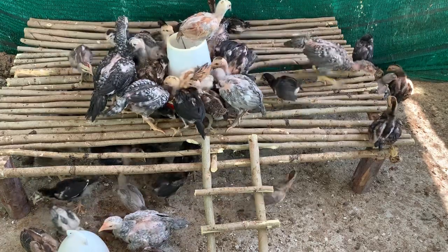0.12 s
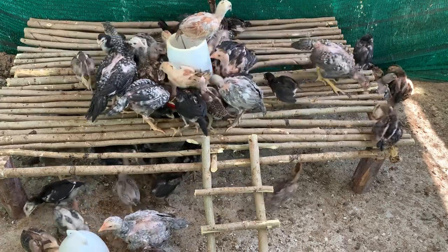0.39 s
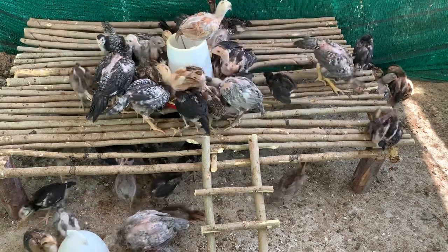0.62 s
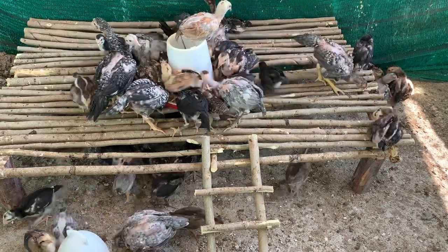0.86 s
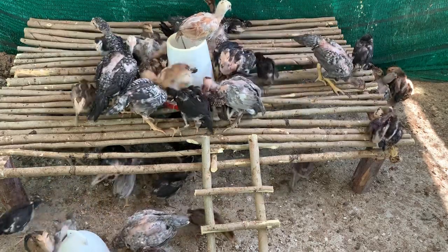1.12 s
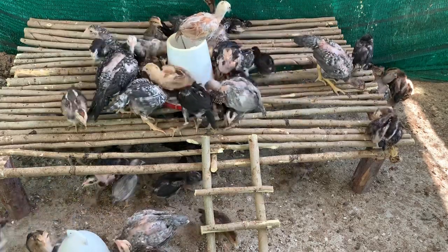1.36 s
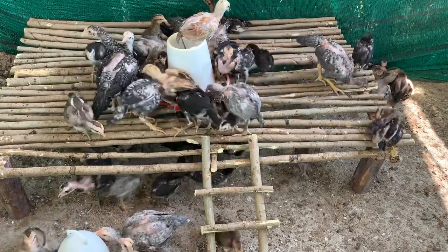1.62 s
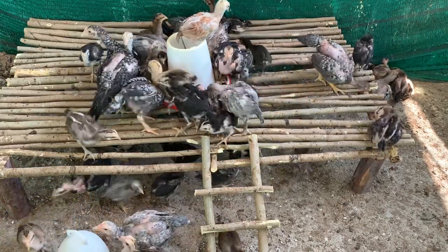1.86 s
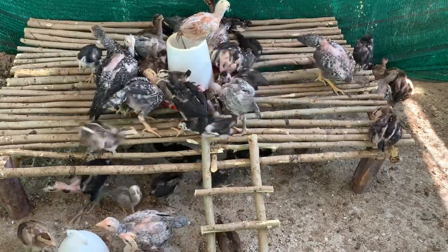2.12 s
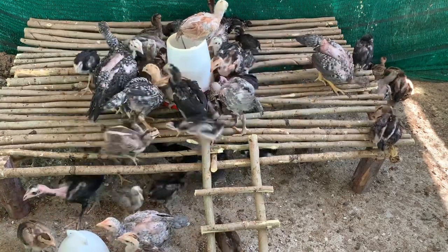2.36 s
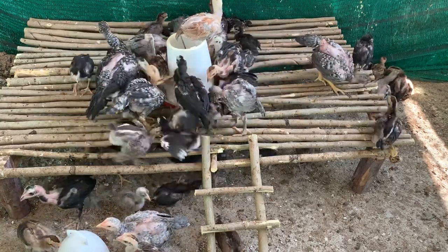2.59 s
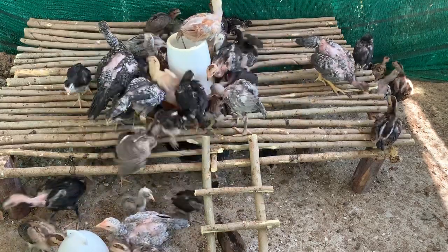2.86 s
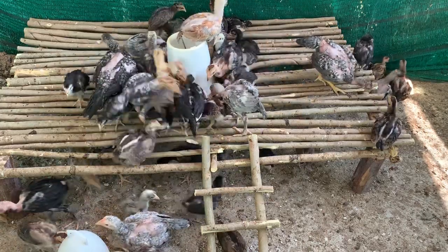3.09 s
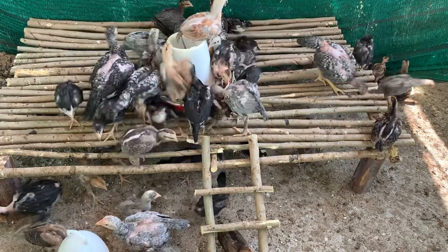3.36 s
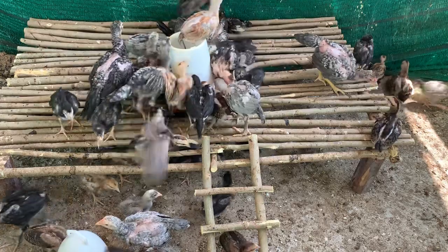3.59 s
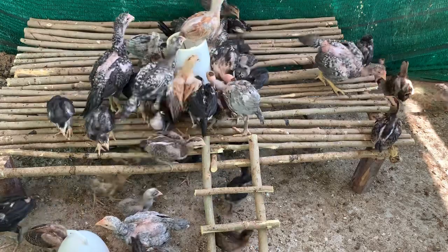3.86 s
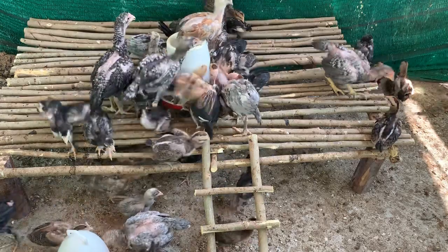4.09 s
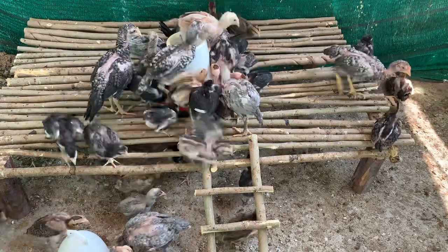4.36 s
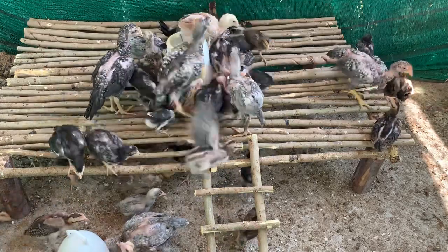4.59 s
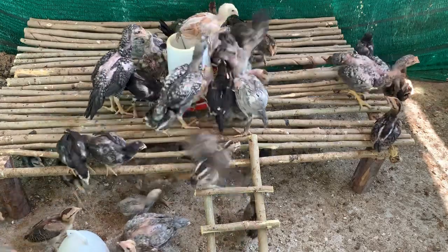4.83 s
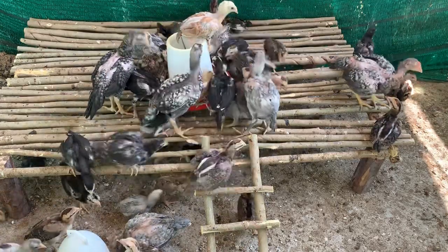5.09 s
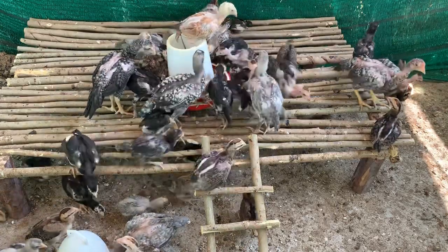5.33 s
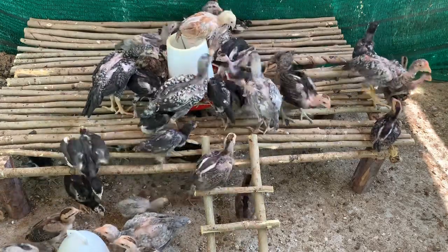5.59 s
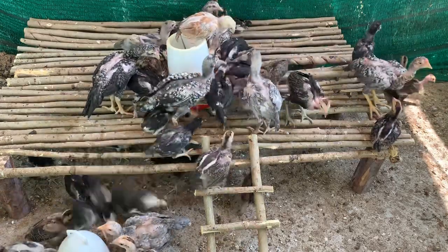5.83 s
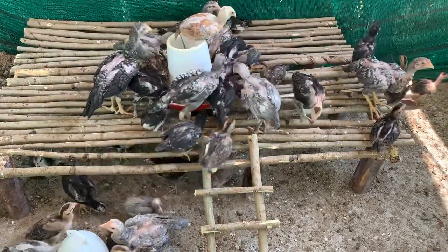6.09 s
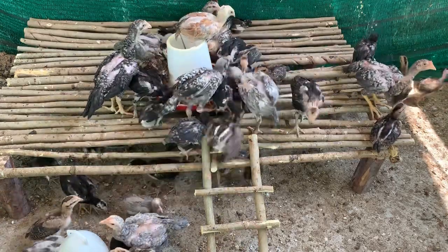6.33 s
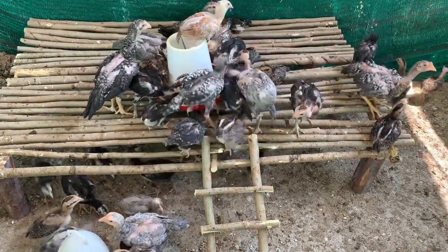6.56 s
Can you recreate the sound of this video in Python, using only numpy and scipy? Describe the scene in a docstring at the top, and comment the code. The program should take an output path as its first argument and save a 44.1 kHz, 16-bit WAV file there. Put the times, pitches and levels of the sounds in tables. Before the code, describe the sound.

A dense flock of young chickens peeps without pause around a feeder, with feet knocking on wooden poles and a few hoarse squawks.

```python
"""In a netted pen with a floor of wooden poles, young chickens peep around a feeder, a metre or two from a phone.
Near chicks are gliding whistles, mostly falling, over a dense chorus of many short whistles.
Rough shaking of the tone makes some squawk hoarsely, and stacked whistles make two shrieks.
Feet and beaks ring the poles as dying tones, grit ticks as short noise, feathers rustle as flickering hiss.
Low noise makes the rumble of the yard, and wavering tones the hum of a distant engine.
"""
import sys
import numpy as np
from scipy import signal
from scipy.fft import rfft, irfft, next_fast_len
from scipy.io import wavfile
from scipy.ndimage import uniform_filter1d

SR = 44100
rng = np.random.default_rng(int(sys.argv[2]) if len(sys.argv) > 2 else 0)


def transcribe(signal):
    """Save signal, clipped to [-1, 1], as a 16-bit WAV file at the path in sys.argv[1]."""
    frames = np.atleast_2d(signal).T
    limited = np.clip(frames, -1, 1)
    pcm = np.round(limited * 32767).astype(np.int16)
    wavfile.write(sys.argv[1], SR, pcm)


def convert_level_to_amplitude(level_db):
    """Map a level in decibels to its linear amplitude factor."""
    exponent = np.asarray(level_db, float) / 20
    return 10 ** exponent


N = 295469  # length in samples
TIME = np.arange(N) / SR  # seconds

OCTAVE_DB = -28  # usual octave in a near call, against its main tone
RASP_HZ = 270.9  # how fast unsteady breath shakes most calls
NEAR_RASP = 0.32  # share of a near call that shakes
PORT_LAG = 13  # samples by which the left port hears the rustle late


def colour(x, points):
    """Filter by (f/Hz, gain/dB) points joined on a log axis."""
    size = next_fast_len(x.shape[-1])
    hz, db = np.transpose(points)
    log_hz = np.log(np.fft.rfftfreq(size, 1 / SR) + 1)
    gain = convert_level_to_amplitude(np.interp(log_hz, np.log(hz), db))
    return irfft(rfft(x, size) * gain, size)[..., :x.shape[-1]]


def level(x, db):
    """Set the average (rms) level."""
    return x * convert_level_to_amplitude(db) / np.sqrt(np.mean(x ** 2))


def curve(table):
    """Gain over time from (t/s, level/dB) rows."""
    return convert_level_to_amplitude(np.interp(TIME, *np.transpose(table)))


def walk(rate, size=N):
    """Smooth chance: about rate changes a second, spread near 1."""
    k = max(int(SR / rate), 1)
    steps = np.repeat(rng.standard_normal(size // k + 1), k)
    return 1.412 * uniform_filter1d(uniform_filter1d(steps, k), k)[:size]


def add(out, s, pair):
    """Mix a two-channel sound in at time s."""
    i = max(int(s * SR), 0)
    out[:, i:i + pair.shape[1]] += pair[:, :N - i]


def ports(x, lag):
    """The left port hears it lag samples later (earlier if negative)."""
    return np.array([np.roll(x, int(round(lag))), x])


def pen(x, t60=0.16, echo_db=-8):
    """Short scattered echoes from poles, ground and netting, 60 dB down after t60 seconds."""
    t = np.arange(int(0.4 * SR)) / SR
    tail = rng.standard_normal((2, len(t))) * convert_level_to_amplitude(-60 * t / t60) * (1 - np.exp(-t / 0.0073))
    tail = convert_level_to_amplitude(echo_db) * tail / np.sqrt(np.sum(tail ** 2, axis=1, keepdims=True))
    return x + signal.fftconvolve(x, tail, axes=1)[:, :N]


def whistle(length, contour_hz, db, lag, octave_db, rasp, rasp_hz, third_db=-80):
    """One call: a gliding voice-organ tone with its octave; unsteady air shakes size and phase."""
    attack_s, release_s = 0.013, 0.033  # longest rise and fall
    third_hz, third_width_hz = 10600, 720  # the throat lifts the third partial in this band

    # u counts in call lengths: the glide runs from 0 to 1, the sound a little beyond
    u = np.arange(-0.1, 1.2, 1 / (length * SR))
    points = np.linspace(0, 1, len(contour_hz))
    bend = np.polyfit(points, contour_hz, len(contour_hz) - 1)
    hz = np.polyval(bend, np.clip(u, 0, 1))
    phase = 2 * np.pi * (np.cumsum(hz) / SR + rng.random())

    rise, fall = min(0.35, attack_s / length), min(0.5, release_s / length)
    shape = np.clip(np.minimum((u + 0.1) / rise, (1.2 - u) / fall), 0, 1) ** 0.75
    chance = walk(rasp_hz, size=len(u)) + 1j * walk(rasp_hz, size=len(u))
    shake = 1 - min(rasp, 1) + rasp * chance

    lagged = phase - 2 * np.pi * np.outer([lag, 0], hz) / SR
    # reflections off the poles make each port waver on its own
    drift = np.array([walk(45, size=len(u)), walk(45, size=len(u))])
    waver = convert_level_to_amplitude(3 * (drift - drift.mean()))
    tone = np.exp(1j * lagged) + convert_level_to_amplitude(octave_db) * np.exp(2j * lagged)
    throat = ((3 * hz - third_hz) / third_width_hz) ** 2
    tone = tone + convert_level_to_amplitude(third_db) * np.exp(3j * lagged - throat)
    return convert_level_to_amplitude(db) * shape * waver * np.real(shake * tone)


def far_flock(count=1500):
    """Many overlapping short peeps at random pitch; most fall, some hold, each bends its own way."""
    # how loud the whole far flock is over time: t/s, level/dB
    mood = [(0.0, -40.5), (0.75, -39), (0.88, -42.5), (1.06, -42), (1.32, -37), (1.57, -40), (1.73, -43.5),
            (1.94, -36.5), (2.07, -36.5), (2.63, -39.5), (2.95, -39), (3.25, -40.5), (3.66, -34.5),
            (4.07, -34.5), (4.53, -32.5), (5.6, -36), (6.44, -37), (6.7, -39)]
    # how strong voices are by their first pitch: f/Hz, level/dB
    voices = [(2000, -30), (2600, -15.5), (3300, -5), (4200, -1.5), (4900, -6), (5500, -13.5),
              (6200, -20.5)]
    lowest_hz = 2000
    out = np.zeros((2, N))
    hz, db = np.transpose(voices)
    for when, pitch, fall, span, size, side, bend in rng.random((count, 7)):
        first_hz = hz[0] + pitch * (hz[-1] - hz[0])
        length = 0.018 + 0.055 * span ** 2.0
        drop = first_hz * length * (9 * fall ** 1.1 - 0.3)
        drop = min(drop, first_hz - lowest_hz)
        size_db = np.interp(first_hz, hz, db) - 11 * size ** 0.6
        middle_hz = first_hz - (0.9 * bend + 0.0486) * drop
        contour_hz = [first_hz, middle_hz, first_hz - drop]
        lag = 6 - 19 * side
        add(out, when * N / SR, whistle(length, contour_hz, size_db, lag, -30, 0.42, RASP_HZ))
    out = pen(out, 0.15, -3.5)  # distance blurs them
    # voices fill each other's pauses, so the sum follows the mood of the flock
    power = uniform_filter1d(np.mean(out ** 2, axis=0), size=2600)
    steady = out / np.sqrt(power + 1e-6)
    return steady * curve(mood)


def rustle():
    """Feathers and litter: patchy hiss from one side; each band flickers on its own."""
    # how the rustle swells and fades: t/s, level/dB (relative)
    swell = [(0.0, -57), (0.3, -60.5), (0.49, -55.5), (0.78, -52.5), (0.95, -57.5), (1.9, -61),
             (3.11, -60.5), (3.58, -59.5), (4.2, -56), (4.3, -56), (4.4, -44.5), (4.55, -49), (4.76, -56.5),
             (5.06, -54), (5.45, -60), (5.8, -52.5), (6.1, -57), (6.7, -60.5)]
    # tone of the hiss: f/Hz, level/dB (relative)
    tint = [(1000, 5.5), (3000, 16), (6500, 1.5), (8000, -0.5), (10000, -3.5), (14000, -5.5), (16000, -38)]
    own_share = 0.45  # noise that differs between the ports
    out = 0
    for hz in [1500, 2600, 4400, 6200, 8000, 10000, 12500, 15000]:
        shared, own = rng.standard_normal(N), rng.standard_normal((2, N))
        hiss = ports(shared, PORT_LAG) + own_share * own
        band = colour(hiss, [(hz / 5.9, -40), (hz / 1.14, 0), (hz * 1.31, 0), (hz * 2.0, -40)])
        out = out + band * convert_level_to_amplitude(3.5 * walk(18) + 3.5 * walk(120))
    patchy = out * convert_level_to_amplitude(1.36 * walk(40))
    return level(colour(patchy, tint), 9.55) * curve(swell)


def yard():
    """Low outdoor rumble, much alike at both ports in the bass, and the wavering engine lines."""
    # tone of the rumble: f/Hz, level/dB (relative)
    tint = [(18, -46.5), (30, -16), (91, -1.5), (151, -3.5), (213, -4), (269, -11.5), (385, -9),
            (650, -19.5), (1090, -19), (2200, -21), (2860, -42), (4840, -120)]
    # steady lines of the distant engine: f/Hz, level/dB (relative)
    engine = [(80.7, -56), (102.3, -56.5), (204.6, -62.5), (382.2, -70)]
    mid, side = rng.standard_normal((2, N))
    side = colour(side, [(60, -12), (250, -11.5), (700, 0.5), (1500, -12.0)])
    rumble = colour(mid + side * np.array([[1], [-1]]), tint)
    rumble = level(rumble, -52.5) * convert_level_to_amplitude(1.4 * walk(3))
    hum = 0
    for hz, db in engine:
        strength = convert_level_to_amplitude(db + 3.5 + 1.7 * walk(4.5))
        wavering_hz = hz + 2.327 * walk(5)
        hum = hum + strength * np.sin(2 * np.pi * np.cumsum(wavering_hz) / SR)
    return (rumble + hum) * convert_level_to_amplitude(np.array([[-0.8], [0.8]]))  # a little stronger on the right


def near_peeps():
    """Clear whistles of near chicks: straight glides, fast swoops and wide-open beaks."""
    # straight glides: t/s, length/s, first f/Hz, last f/Hz, level/dB
    glides = [(0.122, 0.07, 3115, 2170, -38.5), (0.133, 0.08, 3710, 2950, -36),
              (0.223, 0.041, 5340, 5400, -45), (0.285, 0.048, 4970, 3900, -35),
              (0.353, 0.052, 3870, 3310, -28), (0.38, 0.054, 3060, 2530, -34),
              (0.518, 0.056, 4110, 3450, -35.5), (0.427, 0.016, 1812, 1480, -42),
              (0.543, 0.037, 3450, 2900, -30), (0.566, 0.083, 6700, 6500, -51),
              (0.592, 0.054, 3350, 3120, -33), (0.653, 0.023, 4150, 3760, -27.5),
              (3.462, 0.054, 6050, 5900, -41.5), (0.65, 0.03, 5070, 5020, -30),
              (0.676, 0.052, 3310, 3210, -30.5), (0.948, 0.032, 2760, 2690, -36),
              (1.026, 0.072, 2920, 2760, -43), (1.075, 0.048, 4800, 4070, -35),
              (1.125, 0.037, 3770, 3510, -30), (1.173, 0.038, 3400, 3060, -33.5),
              (1.56, 0.035, 4970, 4830, -41), (1.68, 0.039, 3820, 3600, -30.5),
              (1.178, 0.067, 1785, 1540, -42.5), (1.356, 0.034, 3790, 3540, -31.5),
              (1.378, 0.045, 5000, 4600, -40), (1.404, 0.025, 1613, 1715, -45),
              (1.504, 0.047, 3360, 3300, -35), (1.622, 0.017, 3220, 2830, -31),
              (2.146, 0.095, 3520, 3100, -34.5), (2.211, 0.0502, 3870, 3824, -27),
              (2.224, 0.017, 1074, 1080, -43.5), (2.26, 0.027, 1090, 1090, -52),
              (2.448, 0.033, 1570, 1440, -46), (2.246, 0.036, 5220, 4530, -33),
              (2.355, 0.082, 2735, 2410, -38), (2.381, 0.069, 3736, 3133, -29),
              (2.433, 0.07, 4010, 3880, -29), (2.605, 0.051, 3290, 2280, -33.5),
              (2.57, 0.076, 1065, 1154, -53), (2.626, 0.11, 3670, 2473, -29.5),
              (2.727, 0.0125, 2610, 2020, -31.5), (2.746, 0.015, 1180, 1130, -49),
              (2.796, 0.05, 1140, 1140, -53), (2.861, 0.02, 2810, 2130, -27.5),
              (2.892, 0.036, 3910, 3630, -25.5), (2.893, 0.037, 975, 943, -45.5),
              (2.911, 0.034, 2286, 2220, -33.5), (3.008, 0.023, 1395, 1330, -44),
              (3.112, 0.0074, 1690, 1415, -25.5), (3.227, 0.033, 4760, 4500, -34),
              (3.462, 0.071, 3304, 3390, -30), (3.485, 0.022, 3750, 3320, -23),
              (3.769, 0.071, 3420, 3270, -32), (3.781, 0.01247, 2460, 1940, -34),
              (3.834, 0.028, 3850, 3750, -24), (3.882, 0.059, 2840, 2060, -36.5),
              (4.245, 0.075, 1760, 1640, -41), (4.277, 0.024, 5140, 5080, -23.5),
              (4.302, 0.037, 5130, 4000, -32), (4.678, 0.043, 1790, 1655, -38.5),
              (4.544, 0.045, 2048, 1800, -30), (4.652, 0.059, 2610, 2346, -29),
              (4.748, 0.023, 2720, 1970, -32), (4.821, 0.066, 2715, 3000, -30.5),
              (4.86, 0.045, 4410, 4000, -28.5), (4.909, 0.047, 5280, 4550, -33),
              (4.987, 0.056, 1790, 1570, -51), (5.179, 0.028, 1580, 1670, -44),
              (5.42, 0.011, 1620, 1340, -43.5), (5.079, 0.024, 2660, 2040, -30),
              (5.127, 0.03, 5150, 4857, -29), (5.26, 0.026, 2790, 2320, -44),
              (5.343, 0.015, 2850, 2340, -37), (5.472, 0.023, 2680, 2210, -29.5),
              (5.652, 0.06, 1720, 1765, -43), (5.743, 0.038, 3670, 3650, -27.5),
              (5.775, 0.051, 5240, 4870, -28), (5.937, 0.0498, 4170, 3900, -29),
              (6.1, 0.067, 3340, 2298, -38.5), (6.126, 0.03, 1403, 1370, -53),
              (6.263, 0.03, 4506, 4200, -29.5), (6.372, 0.017, 2230, 2180, -34),
              (6.395, 0.025, 1750, 1735, -30.5), (6.441, 0.038, 2560, 2423, -32),
              (6.442, 0.055, 5410, 5020, -32.5), (6.623, 0.027, 1250, 980, -43)]
    # swoops that move fast, then settle on a note: t/s, length/s, first f/Hz, last f/Hz, level/dB
    swoops = [(0.076, 0.056, 5300, 3860, -32), (1.588, 0.056, 4600, 3600, -35.5),
              (1.702, 0.1, 3090, 2107, -40.5), (1.987, 0.072, 2980, 1634, -37),
              (3.334, 0.09, 3570, 3114, -36.5), (3.654, 0.057, 3930, 3660, -26.5),
              (6.252, 0.042, 3400, 1830, -45), (4.008, 0.11, 4360, 3180, -41),
              (6.649, 0.064, 3900, 2950, -30)]
    # share of the drop still to go at the start and after each third of a swoop: share (no unit)
    settle = [1, 0.34, 0.055, 0.04]
    # calls from a wide-open beak, with a strong octave: t/s, length/s, first f/Hz, last f/Hz, level/dB
    open_beak = [(0.008, 0.11, 3504, 2793, -39.5), (1.27, 0.06, 3218, 2920, -38.5),
                 (1.933, 0.11, 3080, 2815, -33.5), (4.085, 0.11, 3233, 3060, -35),
                 (4.884, 0.11, 3097, 3110, -37.5), (6.02, 0.11, 3440, 3380, -47)]
    out = np.zeros((2, N))

    def peep(s, length, contour_hz, db, octave_db=OCTAVE_DB, ahead=False):
        """One chick on its perch; older birds with low voices stand nearly ahead."""
        perch = -3 if contour_hz[0] > 1900 else -2
        lag = perch + 1.86 * rng.standard_normal()
        if ahead or contour_hz[0] > 5500:
            lag = -1
        call = whistle(length, contour_hz, db, lag, octave_db, NEAR_RASP, RASP_HZ, third_db=-24.5)
        add(out, s - 0.13 * length, call)

    for s, length, first_hz, last_hz, db in glides:
        peep(s, length, [first_hz, last_hz], db)
    for s, length, first_hz, last_hz, db in swoops:
        peep(s, length, last_hz + (first_hz - last_hz) * np.array(settle), db)
    for s, length, first_hz, last_hz, db in open_beak:
        peep(s, length, [first_hz, last_hz], db, octave_db=-6.5, ahead=True)
    return out


def knock(db, blow_hz):
    """A blow and its quick rebound ring the pole modes nearest its colour, each slightly detuned."""
    # ringing notes of the poles: f/Hz, level/dB (relative), time to fall 60 dB/s
    modes = [(163, -2, 0.05), (250, 1, 0.05), (390, -1.5, 0.045), (600, 6, 0.025), (905, 7, 0.025),
             (1237, 10, 0.022), (1600, 6, 0.022)]
    t = np.arange(int(0.09 * SR)) / SR
    ring = 0
    for hz, mode_db, t60 in modes:
        octaves_off = np.log2(hz / blow_hz)
        near_db = mode_db - 9.9 * octaves_off ** 2 + 2 * rng.standard_normal()
        tuned_hz = hz * (1 + 0.14 * rng.standard_normal())
        ring = ring + convert_level_to_amplitude(near_db) * np.sin(2 * np.pi * tuned_hz * t) * convert_level_to_amplitude(-60 * t / t60)
    ring = ring + 0.6 * np.roll(ring, int(SR * rng.integers(1, 4) / blow_hz))  # rebound
    contact = uniform_filter1d(rng.standard_normal(len(t)), size=8) * np.exp(-t / 0.0098)
    ring = ring + 0.71 * contact * np.abs(ring).max()  # the hard contact
    ring = ring * (1 - np.exp(-t / 0.0006))  # soft toes push for a moment
    return ports(convert_level_to_amplitude(db) * ring / np.abs(ring).max(), -2)


def poles(count=340):
    """Feet and beaks on the poles: the loud knocks, and a light patter at random times."""
    # loud knocks: t/s, peak level/dB, f/Hz that the blow favours
    knocks = [(0.754, -29.5, 393), (0.823, -33.5, 386), (0.948, -37, 514), (1.626, -45, 894),
              (3.388, -42, 493), (4.2, -36, 460), (5.647, -41, 910), (3.764, -37, 1390), (1.022, -28, 242),
              (1.058, -41, 346), (1.137, -32.5, 505), (1.192, -32, 816), (1.879, -45, 1610),
              (2.072, -34.5, 1090), (0.108, -50, 1400), (0.345, -44, 900), (1.702, -38.5, 470),
              (2.021, -34, 500), (2.655, -39, 725), (2.982, -27.5, 894), (2.998, -33, 1280),
              (3.189, -28, 583), (3.215, -36.5, 227), (3.258, -36, 1390), (3.49, -34.5, 1540),
              (3.544, -29.5, 626), (4.055, -33.5, 1380), (4.111, -37, 726), (4.155, -31.5, 1400),
              (4.312, -35, 556), (4.348, -32, 880), (4.567, -32.5, 408), (4.759, -34.5, 260),
              (4.944, -34.5, 1420), (5.166, -33, 1150), (5.663, -33, 583), (5.827, -35, 616),
              (6.531, -29.5, 1190)]
    out = np.zeros((2, N))
    for s, db, blow_hz in knocks:
        add(out, s, knock(db, blow_hz))
    for when, size, place in rng.random((count, 3)):
        add(out, when * N / SR, knock(-41 - 14 * size, 300 * 6.43 ** place))
    return out


def grit(count=160):
    """Grit and claws: short bright noise cracks with a little scatter; faint ones fall at random."""
    # clear ticks: t/s, level/dB (before the treble filter)
    ticks = [(0.2867, -53), (0.848, -43), (1.8756, -47), (2.1525, -34), (3.3802, -50), (3.9035, -47),
             (4.0647, -41), (4.3206, -43.5), (4.3515, -39), (4.8239, -40), (5.4206, -52)]
    out = np.zeros((2, N))
    t = np.arange(1600) / SR
    faint = [(when * N / SR, -57 - 9 * size) for when, size in rng.random((count, 2))]
    for s, db in list(ticks) + faint:
        fade = np.exp(-t / 0.0022) + 0.5 * np.exp(-t / 0.0053)
        crack = rng.standard_normal(len(t)) * fade
        add(out, s, ports(convert_level_to_amplitude(db) * crack, PORT_LAG - 3))
    return colour(out, [(2500, -42), (7000, -18), (10000, 11.5), (15000, -16.0)])


def squawk(length, contour_hz, db, rasp_hz):
    """The voice breaks into uneven rasping pulses."""
    call = whistle(length, contour_hz, db, -10.0, -31.5, 0.97, rasp_hz)
    return call * convert_level_to_amplitude(4 * np.tanh(walk(324, size=call.shape[1])))


def caller():
    """One near chick peeps again and again, nearly alike, with two close voices and a hoarse edge."""
    # its peeps: t/s, level/dB
    calls = [(0.212, -37), (0.768, -40), (1.14, -36), (1.495, -31.5), (1.928, -32.5), (2.361, -33),
             (2.737, -28.5), (3.181, -29), (3.542, -31), (3.923, -32.5), (4.41, -30), (4.762, -30),
             (5.103, -29), (5.43, -31.5), (5.773, -28), (6.165, -31.5), (6.501, -32)]
    # its glide, first and last: f/Hz
    glide_hz = [4335, 3900]
    length, lag = 0.035, -10  # seconds, samples
    beat_hz, beat_db = 156.6, 1  # the second voice lies this far below, and this much louder
    out = np.zeros((2, N))
    for s, db in calls:
        upper_hz = np.multiply(glide_hz, 1 + 0.0117 * rng.standard_normal())
        for line_hz, line_db in ((upper_hz, db), (upper_hz - beat_hz, db + beat_db)):
            voice = whistle(length, line_hz, line_db, lag, OCTAVE_DB, NEAR_RASP, RASP_HZ)
            add(out, s - 0.1 * length, voice)
        add(out, s - 0.01, squawk(0.065, glide_hz, db - 9.5, 750))
    return out


def hoarse_calls():
    """A few squawks: gliding calls broken up by rasp."""
    # t/s, length/s, first f/Hz, last f/Hz, level/dB
    hoarse = [(0.754, 0.15, 2763, 2494, -37), (4.339, 0.099, 3390, 3100, -26),
              (4.44, 0.11, 3610, 3350, -36), (5.608, 0.1, 3940, 3040, -40)]
    out = np.zeros((2, N))
    for s, length, first_hz, last_hz, db in hoarse:
        add(out, s - 0.13 * length, squawk(length, [first_hz, last_hz], db, 643))
    return out


def shrieks():
    """Two-voiced shrieks: a low gliding line with evenly spaced sidebands above."""
    # t/s, length/s, first f/Hz, lower bend f/Hz, last f/Hz, level/dB
    cries = [(5.743, 0.15, 2975, 1993, 2327, -28), (5.93, 0.058, 2860, 1948, 1766, -30)]
    # the low line and each sideband above it, in order: level/dB (relative)
    sidebands = [-2.5, 1.5, 1, -3.5, -7]
    spacing_hz = 420
    out = np.zeros((2, N))
    for s, length, first_hz, low_hz, last_hz, db in cries:
        contour_hz = [first_hz, low_hz, (low_hz + last_hz) / 2, last_hz]
        for k, side_db in enumerate(sidebands):
            line_hz = np.add(contour_hz, k * spacing_hz)
            line = whistle(length, line_hz, db + side_db, -7.5, OCTAVE_DB, 0.6, 300)
            add(out, s - 0.089 * length, line)
    return out


def scene():
    """Birds lean a little to the left; rustle and yard get no echoes."""
    birds = far_flock() + near_peeps() + caller() + hoarse_calls() + shrieks()
    birds = birds * convert_level_to_amplitude(np.array([[0.5], [-0.5]]))
    return pen(birds + poles() + grit()) + rustle() + yard()


def roll_off(x):
    """The treble ends steeply here."""
    return signal.sosfilt(signal.butter(12, 15750, fs=SR, output="sos"), x)


def record(dry):
    """The phone drops the deepest bass, below about 40 Hz."""
    high_pass = signal.butter(3, 40, "high", fs=SR, output="sos")
    thin = signal.sosfilt(high_pass, dry)
    return roll_off(thin)


dry = scene()
out = record(dry)
transcribe(out)
```